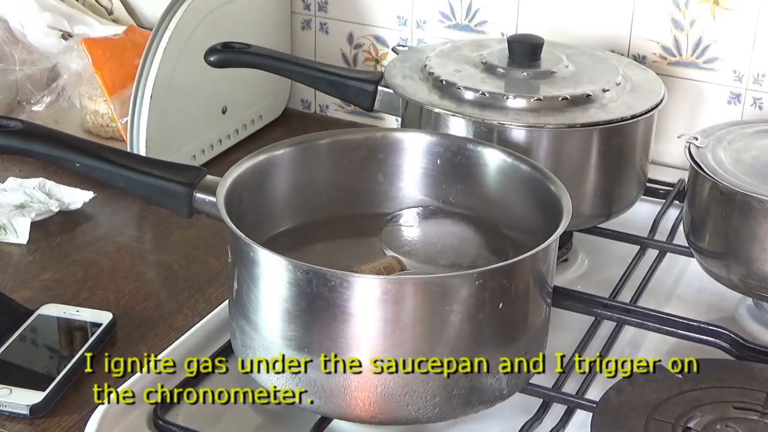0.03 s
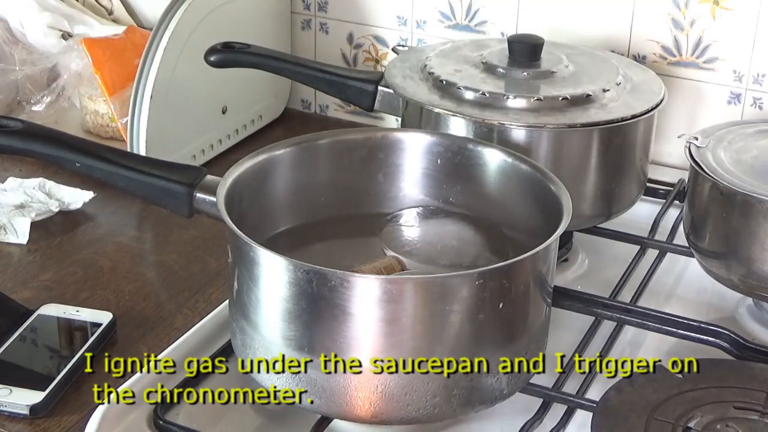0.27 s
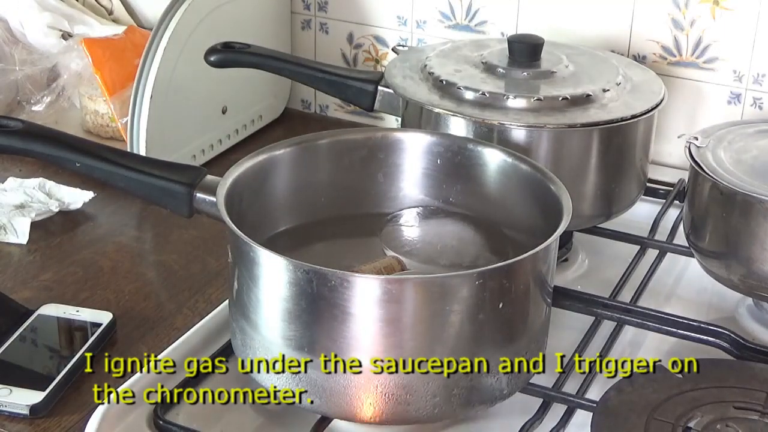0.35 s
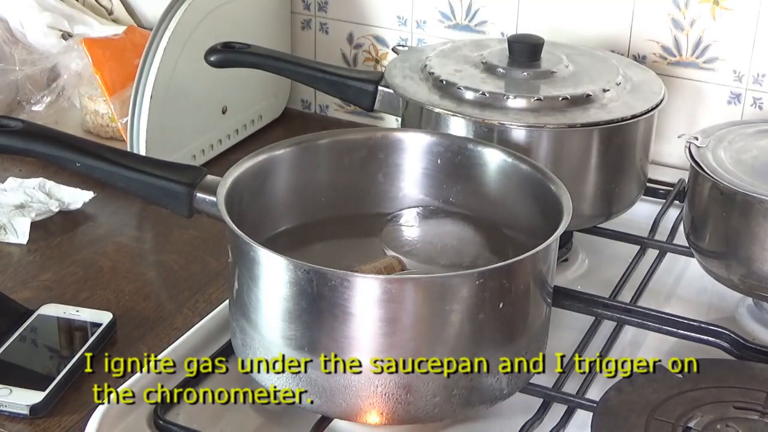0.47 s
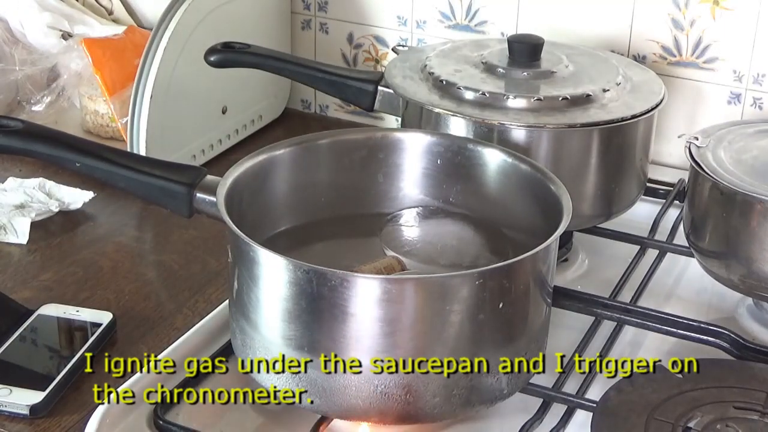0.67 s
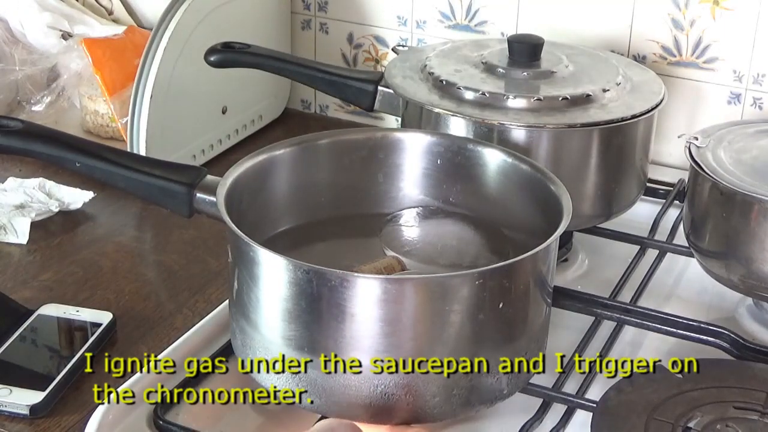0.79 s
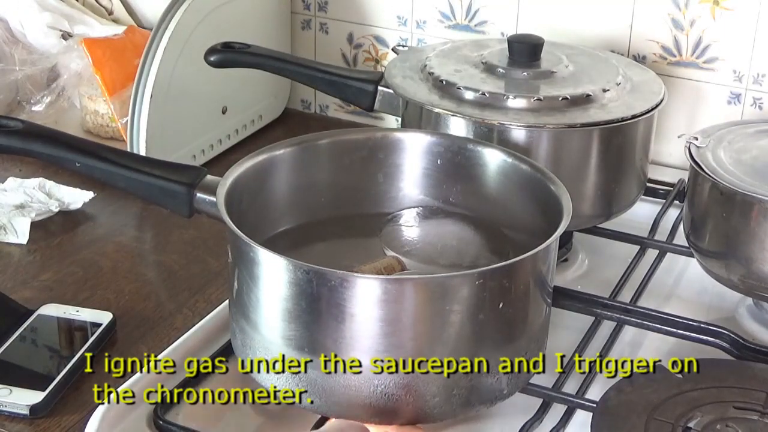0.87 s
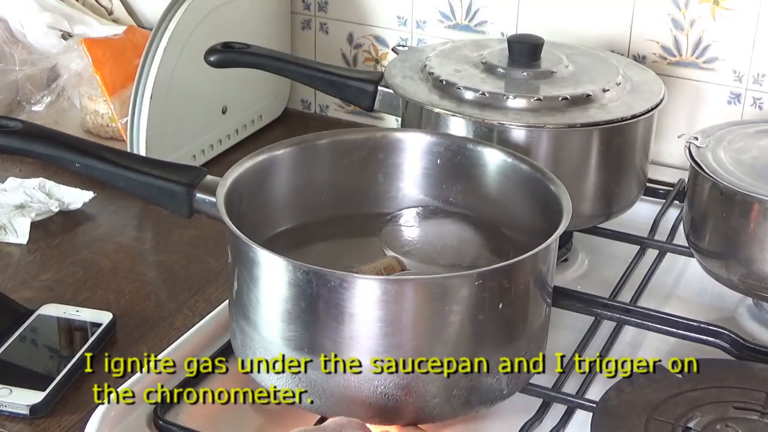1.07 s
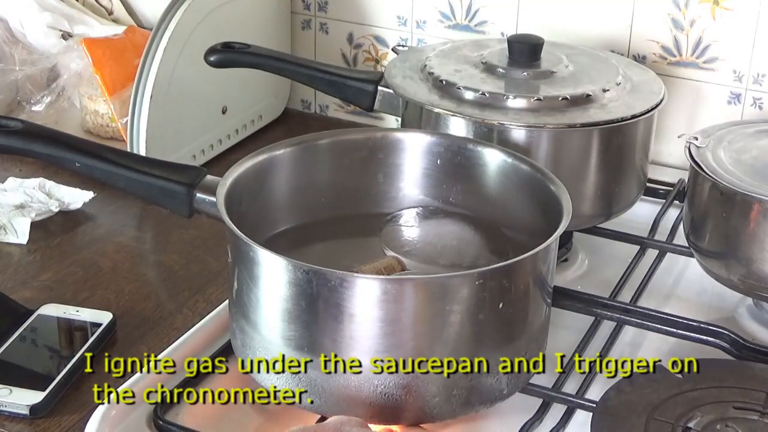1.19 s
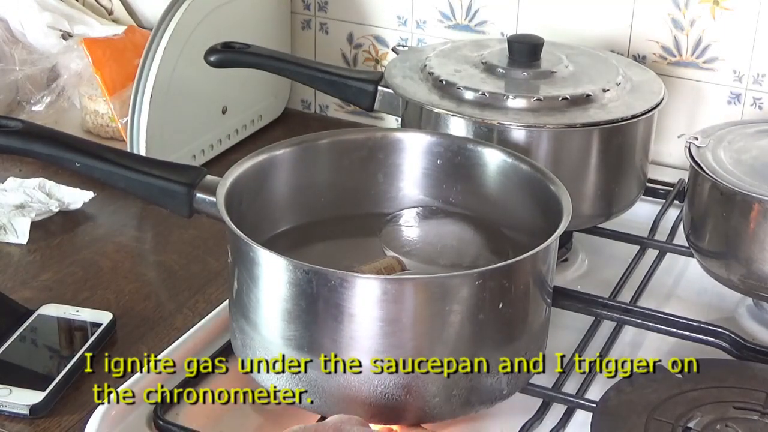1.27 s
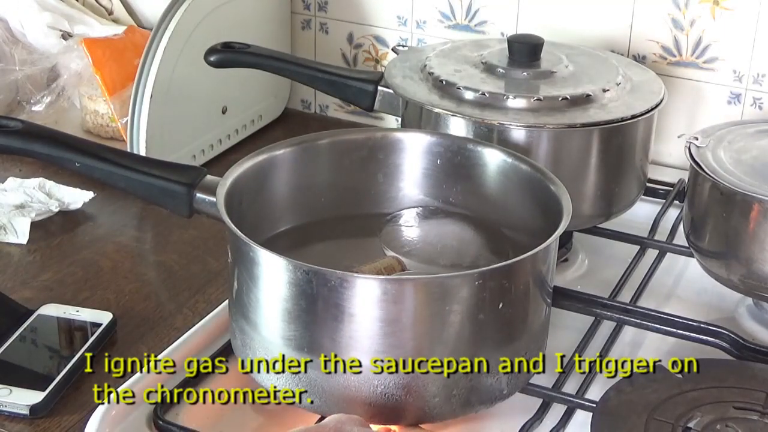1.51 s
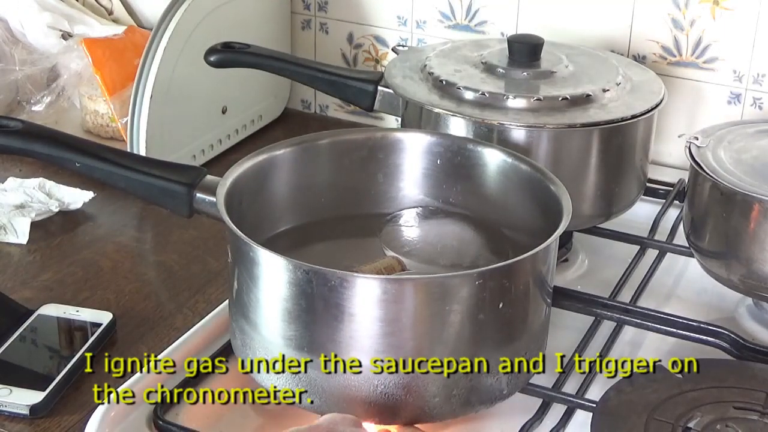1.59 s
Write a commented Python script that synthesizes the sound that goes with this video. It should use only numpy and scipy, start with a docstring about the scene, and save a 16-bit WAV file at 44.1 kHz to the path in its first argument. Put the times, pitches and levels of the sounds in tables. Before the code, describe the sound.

A gas hob igniter snaps and rattles with small flame puffs, a knob clicks, fire pops softly around the burner, then gas hisses thinly; close microphone in a small tiled kitchen.

```python
"""An igniter snaps and rattles, its flame flares in short puffs and steel pans ring faintly.
A gas knob clicks, fire runs round the burner in soft pops, and the jet settles to a thin, rising hiss.
It is a gas hob lit under a saucepan in a small tiled kitchen, heard from close by.
Clicks and pops are sharp edges with scattered echoes, passed through resonances or tone curves.
Flares, fire and gas are shaped noise; the room adds a fading echo."""
import sys
import numpy as np
from scipy import signal
from scipy.fft import rfft, irfft
from scipy.io import wavfile
from scipy.ndimage import map_coordinates

SR = 44100
rng = np.random.default_rng(int(sys.argv[2]) if len(sys.argv) > 2 else 0)


def wav_out(sig):
    """Save sig, one row per channel (or a flat mono array), as 16-bit PCM at SR to the path in sys.argv[1]."""
    wavfile.write(sys.argv[1], SR, np.round(np.clip(np.atleast_2d(sig).T, -1, 1) * 32767).astype(np.int16))


N = 72765  # length in samples

CLICK_SCATTER = 1.1  # strength of the echoes after an edge, for igniter clicks and housing knocks


def undb(db):
    """Turn decibels into a plain multiplier."""
    return 10 ** (np.asarray(db) / 20)


def unit(x):
    """Scale a sound to a total energy of one."""
    return x / np.sqrt(np.sum(x ** 2))


def along(table, col=1):
    """Join a column of a time table by straight lines, holding its end values outside."""
    rows = np.array(table)
    return np.interp(np.arange(N) / SR, rows[:, 0], rows[:, col])


def across(table, hz, col=1):
    """Read a column of a frequency table, with frequency on a log scale."""
    rows = np.array(table)
    return np.interp(np.log(np.maximum(hz, 1)), np.log(rows[:, 0]), rows[:, col])


def through(x, response):
    """Pass a sound through an object that answers a single tap with this response."""
    return signal.fftconvolve(x, response)[:N]


def colour(table, size=2048):
    """Make a response with the given tone curve that starts at once (minimum phase)."""
    level = undb(across(table, np.fft.rfftfreq(size, 1 / SR)))
    cepstrum = irfft(np.log(level))
    # folding the second half onto the first moves the energy to the start
    cepstrum[1:size // 2] *= 2
    cepstrum[size // 2 + 1:] = 0
    return unit(irfft(np.exp(rfft(cepstrum))))


def ring(modes, size=1024):
    """Add up resonances as dying sine waves; a wider resonance dies sooner."""
    t = np.arange(size) / SR
    total = 0
    for k, (hz, width, db) in enumerate(modes):
        fade = width * np.exp(-np.pi * width * t)
        total = total + (-1) ** k * undb(db) * fade * np.sin(2 * np.pi * hz * t)
    return unit(total)


def blows(rows, scatter, size=1024):
    """For each (start s, level dB, decay s), a sharp edge followed by a brief scatter of echoes."""
    out = np.zeros(N + size)
    t = np.arange(size) / SR
    grains = rng.standard_normal((len(rows), size))
    for (at, db, decay), grain in zip(rows, grains):
        blow = scatter * unit(grain * np.exp(-t / max(decay, 1 / SR)))
        blow[0] = 1  # the sharp edge
        i = int(np.clip(at * SR, 0, N))
        out[i:i + size] += undb(db) * unit(blow)
    return out[:N]


def flutter(rate, depth_db):
    """Make noise whose level wavers at random, heading for a new value `rate` times a second."""
    knots = rng.standard_normal(N // 10)
    wobble = np.interp(np.arange(N) / SR * rate, np.arange(len(knots)), knots)
    noise = rng.standard_normal(N) * undb(depth_db * np.tanh(wobble))
    return np.sqrt(N) * unit(noise)


def detuned(modes):
    """The same metal struck at another spot: each resonance a little shifted, stronger or weaker."""
    detune, spread_db = .022, 3  # largest shift (share of the pitch) and largest level change
    chance = rng.uniform(-1., 1., (len(modes), 2))
    return [(hz * (1 + detune * a), width, db + spread_db * b)
            for (hz, width, db), (a, b) in zip(modes, chance)]


def igniter(count=4):
    """Sharp metallic clicks, each with its own tint, over the patchy rattle of loose contacts."""
    # Each row: start in seconds, level in dB, level of the lower crack in dB above the click,
    # decay of the scattered echoes in ms.
    clicks = [(0.03, -46.5, 14, 12), (0.058, -34.5, 6.5, 9.6), (0.1341, -39, 12, 3.6),
              (0.1454, -32, 6.5, 4.5), (0.1722, -32, 1, 0.87), (0.1802, -35, 1, 0.82), (.187, -33, -8, 1),
              (.198, -33, -19, 1), (0.2063, -14, 1.5, 3.2), (0.2136, -16.5, 2, 1.4),
              (0.2254, 1.5, -1.5, 3.7), (0.2562, -19.5, 6.5, 1.1), (.263, -28.5, -2, 1.1),
              (0.3116, -12.5, 8.5, 1.6), (0.3423, -14, -9, 1.2), (0.3578, 1, -1, 2.7),
              (0.3945, -15, -5, 1.3), (0.408, -5.5, -17, 1.4), (0.41, -5.5, 1, 6.6), (.429, -14, -12, 1.5),
              (0.4393, -10.5, -3, 0.86), (0.454, -24, -2, 1.2), (0.4576, -9, 6.5, 3.3),
              (0.4747, -22, -6, 1), (0.4806, 4, -9.5, 4.8), (0.5071, -4.5, -9, 3.9), (0.5122, -3, -7, 1.9),
              (0.5157, -5, -26, 1.7), (0.52, -13, -20, 0.59), (0.536, 1.5, -33, 2.4),
              (0.5424, -3.5, 0, 2.5), (0.55, 0, -10, 3), (0.568, -20, -7, 1.2), (.572, -15, -14, 1.2),
              (0.5982, -18, -7, 1.2), (0.6055, -12.5, -1, 4.6), (.631, -12, -4.5, 4.9), (0.6411, -18, 2, 4),
              (.6663, -31, -12, 1), (.674, -17, -6, 2.7), (.678, -18, -4, 1.5), (.686, -18, 0, 3.5),
              (0.711, -31, -15, 1.9), (.7167, -22, 0, 3.2), (0.7256, -10.5, 2, 4), (0.729, -15, -2.5, 2.6),
              (.752, -34, -3, 0.73), (0.772, -36, -12, 1.4), (0.823, -33, -30, 1.4)]
    # Ring of the metal. Each row: pitch in Hz, width in Hz, relative level in dB.
    metal_modes = [(8580, 624, -0.5), (8990, 540, 2), (10230, 350, -0.5), (11800, 960, -10.5),
                   (14600, 900, -47)]
    # Tone of the broad crack. Each row: frequency in Hz, relative level in dB.
    crack_tone = [(40, -74), (150, -45), (350, -14.5), (700, -14), (1700, -4.5), (2700, -8), (4400, -3.5),
                  (7000, 0.5), (11500, -1.5), (13500, -12), (16000, -21)]
    # Loose rattle. Each row: time in seconds, level in dB.
    rattle_level = [(0, -58), (.11, -70.5), (.15, -65.5), (.28, -42.5), (.32, -54), (.39, -44.5),
                    (.45, -45.5), (.49, -40.5), (.58, -44), (.655, -53.5), (.72, -51), (.77, -54),
                    (.87, -63), (1.0, -94)]
    ticks_per_s = 700  # average, for each loose contact
    patches_per_s, patch_depth_db = 90, 5
    metal = 0
    for at, db, low, ms in clicks:
        click = blows([(at, db, ms / 1000)], CLICK_SCATTER)
        metal = metal + through(click, ring(detuned(metal_modes)))
    crack = blows([(at, db + low, ms / 1000) for at, db, low, ms in clicks], CLICK_SCATTER)
    for _ in range(count):  # loose contacts
        ticks = rng.random(N) < ticks_per_s / SR
        grains = np.sqrt(N / count) * unit(ticks * flutter(patches_per_s, patch_depth_db))
        rattle = grains * undb(along(rattle_level))
        metal = metal + through(rattle, ring(detuned(metal_modes)))
        crack = crack + rattle
    return metal + through(crack, colour(crack_tone))


def housing():
    """Some clicks also knock one short, broad resonance of the igniter's housing."""
    # Each row: start in seconds, level in dB, centre of the resonance in Hz.
    knocks = [(.1335, -28, 1540), (.1442, -27, 3750), (0.2267, -1.5, 4530), (.3581, -5, 6100)]
    # Shape of the resonance. Each row: multiple of its centre, relative level in dB.
    knock_shape = [(.05, -55), (.4, -23), (.75, -3), (1, 0), (1.35, -3), (2.2, -12), (3.5, -30)]
    decay_s = .002
    total = 0
    for at, db, hz in knocks:
        tone = [(hz * multiple, fall) for multiple, fall in knock_shape]
        total = total + through(blows([(at, db, decay_s)], CLICK_SCATTER), colour(tone))
    return total


def flares():
    """The igniter's flame puffs: rough noise rises fast, holds and dies away, with soft pushes of air."""
    # Each row: start in seconds, level in dB, attack in seconds, hold in seconds,
    # decay in seconds, bass in dB above the middle, treble in dB above the middle.
    puff_rows = [(0.294, -36.5, 0.0028, 0.016, 0.015, -33, 5),
                 (0.312, -40.5, 0.0094, 0.011, 0.11, -14.5, -3.5), (.433, -42.5, .002, .008, .012, -8, -12),
                 (.4525, -27.5, .0006, .004, .008, -24, -6), (0.46, -38.5, 0.0049, 0.014, 0.018, 0, 1),
                 (0.499, -44, 0.0051, 0.034, 0.062, -3, 1), (0.673, -47.5, .005, 0.052, 0.014, -9, -2)]
    # Tones of the three bands. Each row: frequency in Hz, relative level in dB.
    middle_tone = [(40, -56), (150, -31), (300, -22.5), (700, -6), (1100, 3), (2050, 2), (2800, -6),
                   (5000, -23.5)]
    bass_tone = [(30, -45), (70, -61), (105, -6.5), (180, -13.5), (300, -6), (450, -.5), (750, 6.5),
                 (1200, -5.5), (3000, -67)]
    treble_tone = [(100, -56), (1200, -2.5), (3000, 1), (6500, 3), (9000, 5), (11000, -21), (13000, -18),
                   (16000, -38)]
    # Soft pushes of air. Each row: time of the middle in seconds, level in dB.
    thumps = [(.345, -71), (0.477, -64), (0.536, -77), (.886, -74)]
    thump_hz, thump_s = 50, .009
    t = np.arange(N) / SR
    bands = np.zeros((3, N))
    for at, db, attack, hold, decay, bass, treble in puff_rows:
        rise = np.clip((t - at) / attack, 0, 1)
        fall = np.exp(-np.maximum(t - at - attack - hold, 0) / decay)
        bands += undb([[db], [db + bass], [db + treble]]) * rise * fall
    total = 0
    for band, tone in zip(bands, (middle_tone, bass_tone, treble_tone)):
        total = total + through(band * flutter(400, depth_db=4), colour(tone))
    for at, db in thumps:
        swell = np.exp(-((t - at) / thump_s) ** 2)
        total = total + undb(db) * swell * np.sin(2 * np.pi * thump_hz * (t - at))
    return total


def jet():
    """Gas rushes through the burner tube, whose resonances creep upward; a faint, wavering whistle joins."""
    # Each row: time in seconds, level in dB.
    jet_level = [(.80, -73), (.90, -56.5), (1.0, -56), (1.3, -55.5), (1.42, -57.5), (1.52, -56.5),
                 (1.65, -56)]
    # Resonances of the tube. Each row: pitch in Hz, width in Hz, relative level in dB.
    tube_modes = [(1940, 160, -8.5), (5000, 1540, -6.5), (6750, 270, 2), (8840, 310, -3), (10520, 500, -2)]
    # Tone of the rush. Each row: frequency in Hz, relative level in dB.
    rush_tone = [(25, -20), (70, -28), (140, -4), (220, -4), (350, 13.5), (550, -3), (780, 4), (1050, -17),
                 (1500, 7), (3000, -17), (6000, 2.5), (10000, 7), (16000, -14.5)]
    # Breathy whistle. Each row: time in seconds, level in dB.
    whistle_level = [(.9, -62), (1.0, -63), (1.36, -62), (1.47, -69), (1.52, -58.5), (1.58, -61),
                     (1.65, -60.5)]
    rush_db = -4  # against the hiss
    rise_per_s, tuned_s = .12, 1.5  # pitch rise as a share per second; time when the tube is in tune
    whistle_hz, width_hz = 2115, 55
    waver_share, wavers_per_s = .016, 25
    t = np.arange(N) / SR
    # reading a sound faster or slower moves its pitch; two copies leave enough to read
    tube = np.tile(through(rng.standard_normal(N), ring(tube_modes)), 2)
    pitch = 1 + rise_per_s * (t - tuned_s)
    hiss = map_coordinates(tube, [np.cumsum(pitch)], order=5)
    rush = through(rng.standard_normal(N), colour(rush_tone))
    note = through(rng.standard_normal(N), ring([(whistle_hz, width_hz, 0)], size=4096))
    knots = rng.standard_normal(N // 10)
    waver = 1 + waver_share * np.interp(t * wavers_per_s, np.arange(len(knots)), knots)
    whistle = map_coordinates(np.tile(note, 2), [np.cumsum(waver)], order=3)
    whistle = whistle * (t > whistle_level[0][0])
    gas = undb(along(jet_level)) * (hiss + undb(rush_db) * rush)
    return gas + undb(along(whistle_level)) * whistle


def knob():
    """The gas knob clicks as it turns: each hit makes it ring and sounds its duller body."""
    # Each row: start in seconds, level in dB, decay of the scattered echoes in ms.
    knob_clicks = [(0.8496, -18.5, 6.5), (0.8807, -9, 1.75), (0.8884, -14, 2.4)]
    # Each row: pitch in Hz, width in Hz, relative level in dB.
    knob_modes = [(8000, 700, -3), (8800, 800, 0), (11200, 600, -4)]
    # Tone of the body. Each row: frequency in Hz, relative level in dB.
    body_tone = [(60, -26), (300, -6.5), (800, 1.5), (2000, 4), (3000, -3.5), (6000, -2), (12000, -16),
                 (16000, -27)]
    body_db = -1.5  # against the ring
    hits = blows([(at, db, ms / 1000) for at, db, ms in knob_clicks], scatter=1.8)
    return through(hits, ring(knob_modes)) + undb(body_db) * through(hits, colour(body_tone))


def burner():
    """Fire jumps from port to port: hollow pops, each at its own pitch, in a fluttering, sizzling roar."""
    # Each row: start in seconds, level in dB, crack in dB above the pop, pitch in Hz.
    pop_rows = [(1.017, -26, -15, 1370), (1.0397, -24, 8.5, 1630), (1.0672, -24.5, -1, 368),
                (1.0795, -24.5, 2, 1520), (1.1075, -24.5, 3, 1460), (1.137, -26.5, -12, 1065),
                (1.1457, -19.5, -3, 925), (1.158, -24, 3.5, 740), (1.1835, -22, -15, 1130),
                (1.203, -20.5, -9, 1160), (1.2148, -20, -14, 1120), (1.228, -21, -1, 1010),
                (1.2455, -23, -20, 554), (1.2635, -24, 3, 840), (1.2719, -21.5, 0, 430),
                (1.291, -34, -6, 1100), (1.299, -17, -10, 1300), (1.3111, -23.5, 6.5, 1400),
                (1.3177, -21.5, -8, 1840), (1.328, -22, -16, 800), (1.336, -34, -18, 1450),
                (1.343, -21, -7, 725), (1.354, -22, -6, 474), (1.3585, -21.5, -2.5, 780),
                (1.374, -34, -19, 1230), (1.3835, -38, -20, 766), (1.399, -27, -10, 650),
                (1.419, -30, -16, 715)]
    # Spreading fire. Each row: time in seconds, roar in dB, sizzle in dB.
    fire_level = [(.988, -90, -65), (1.003, -53, -42), (1.05, -55, -56.5), (1.13, -47, -66),
                  (1.22, -53, -74), (1.3, -49, -56), (1.37, -58, -75), (1.42, -74, -72), (1.48, -63, -79),
                  (1.65, -62, -72)]
    # Tones of the roar and of the crackle. Each row: frequency in Hz, relative level in dB.
    flame_tone = [(30, -35), (80, -19), (140, -6), (220, -6.5), (330, 3.5), (550, -1.5), (800, 4),
                  (1300, 1), (2100, -5), (2900, -17.5), (6000, -30), (16000, -34)]
    crackle_tone = [(60, -50), (400, -30), (1500, 8), (2600, -0.5), (4500, -2), (7000, -7), (10000, -7.5),
                    (13000, -17), (16000, -29)]
    pop_s, pop_scatter = .0028, 1.9  # decay and strength of the scattered echoes
    hollow_db, hollow_cycles = -2, 1.0  # level against the pop; decay in cycles of its pitch
    pops = blows([(at, db, pop_s) for at, db, crack, hz in pop_rows], pop_scatter)
    cracks = blows([(at, db + crack, pop_s) for at, db, crack, hz in pop_rows], pop_scatter)
    hollow = 0
    for at, db, crack, hz in pop_rows:
        age = np.maximum(np.arange(N) / SR - at, 0)
        swell = age * np.exp(-age * hz / hollow_cycles)
        hollow = hollow + undb(db + hollow_db) * unit(swell * np.sin(2 * np.pi * hz * age))
    roar = flutter(200, depth_db=5.5) * undb(along(fire_level))
    sizzle = flutter(230, depth_db=3) * undb(along(fire_level, col=2))
    low = through(pops + roar, colour(flame_tone))
    return hollow + low + through(cracks + sizzle, colour(crackle_tone))


def pans(x):
    """The steel pans and grate ring in sympathy: long, dying sine waves set off by every sound."""
    # Each row: pitch in Hz, relative level in dB, time to die by 60 dB in seconds.
    pan_modes = [(625, -14, .4), (760, -6, .45), (805, -8, .4), (1101, -7, .4), (1554, -5, .35),
                 (2102, -9, .3), (2390, -7, .4), (2674, -10, .4)]
    pans_db = -12  # overall
    t = np.arange(N) / SR
    chime = sum(undb(db - 60 * t / t60) * np.sin(2 * np.pi * hz * t) for hz, db, t60 in pan_modes)
    return undb(pans_db) * through(x, chime * 160 / SR)


def kitchen(x, count=14):
    """Echo of tiled walls: noise in overlapping bands, each fading at its own pace."""
    # Each row: frequency in Hz, time to die by 60 dB in seconds, echo level in dB.
    room = [(96, 1, -9.5), (400, 0.43, 0), (1330, 0.61, -3.5), (3100, 0.46, -2), (6050, 0.28, -7.5),
            (9900, 0.09, -13), (14200, 0.2, -0.5)]
    t = np.arange(N) / SR
    hz = np.fft.rfftfreq(N, 1 / SR)
    centres = np.geomspace(room[0][0], room[-1][0], count)
    noise = rfft(rng.standard_normal(N))
    tail = 0
    for centre, share in zip(centres, np.eye(count)):
        band = irfft(noise * np.interp(hz, centres, share), N)
        build_up = 1 - np.exp(-t / 0.0016)
        fade = unit(np.exp(-np.log(1000) * t / across(room, centre)) * build_up)
        tail = tail + band * fade * undb(across(room, centre, col=2))
    return through(x, tail)


def quiet():
    """The room's own faint background: steady noise with a fixed tone."""
    # Each row: frequency in Hz, relative level in dB.
    quiet_tone = [(25, -18), (70, -27), (150, 6), (300, 7), (750, 12), (1600, 4), (3000, 4), (7000, -4.5),
                  (10000, -6), (13000, -5), (16000, -3)]
    quiet_db = -60
    return undb(quiet_db) * through(rng.standard_normal(N), colour(quiet_tone))


def scene():
    """All sources sit straight ahead; the room and its quiet give the width."""
    # Each row: frequency in Hz, side (left-right difference) against middle in dB.
    width = [(60, -6), (150, -13), (350, -15), (1200, -8), (2500, -6), (4500, -7.5), (8500, -5),
             (15000, -33)]
    left_db = -.4
    near = igniter() + housing() + flares() + jet() + knob() + burner()
    near = near + pans(near)
    mid, side = (kitchen(near) + quiet() for _ in range(2))
    side = irfft(rfft(side) * undb(across(width, np.fft.rfftfreq(N, 1 / SR))), N)
    left = (near + mid + side) * undb(left_db)
    right = near + mid - side
    return np.array([left, right])


def record(dry):
    """The recorder cuts the top: a steep filter stops what lies above its limit."""
    top_hz = 15900
    steep = signal.ellip(10, .2, 80, top_hz, fs=SR, output="sos")
    return signal.sosfilt(steep, dry)


dry = scene()
out = record(dry)
wav_out(out)
```